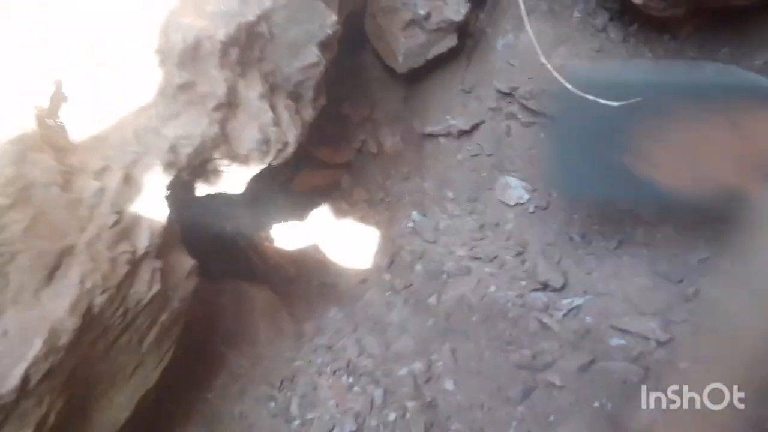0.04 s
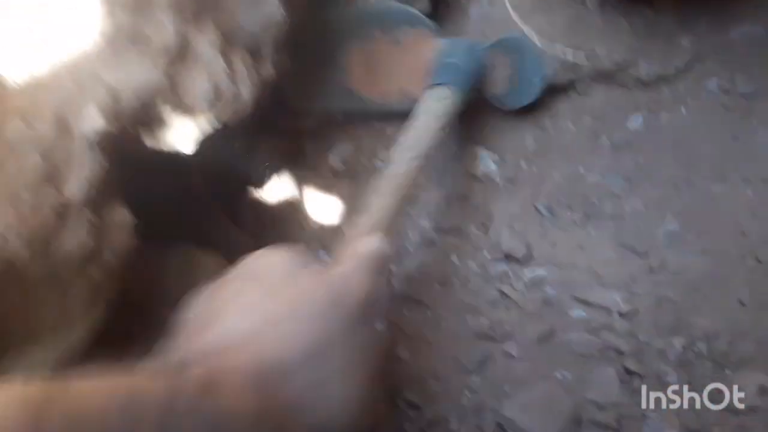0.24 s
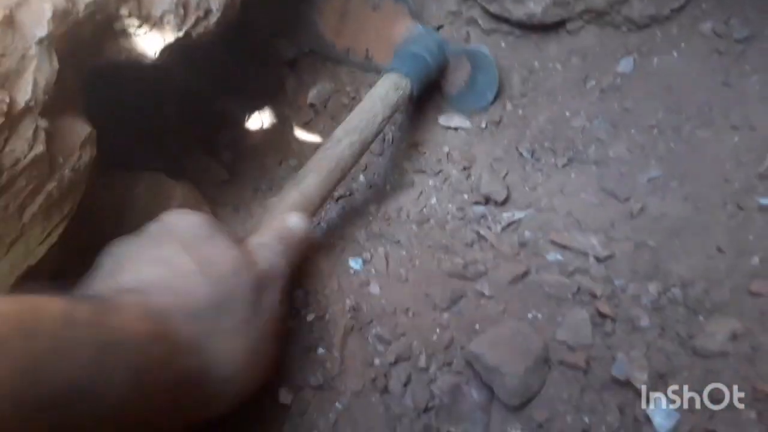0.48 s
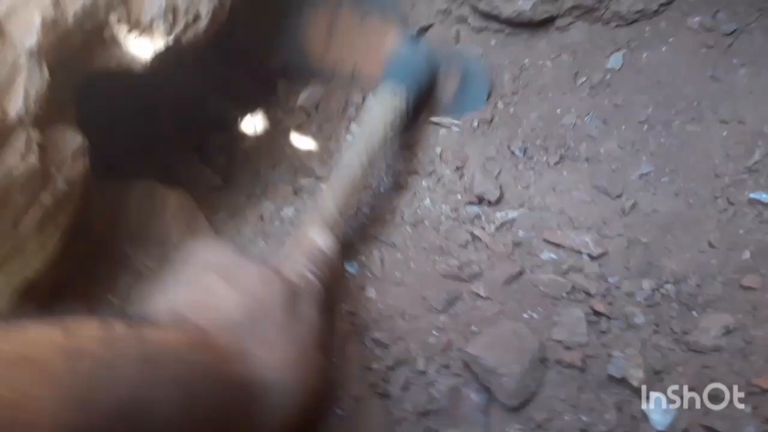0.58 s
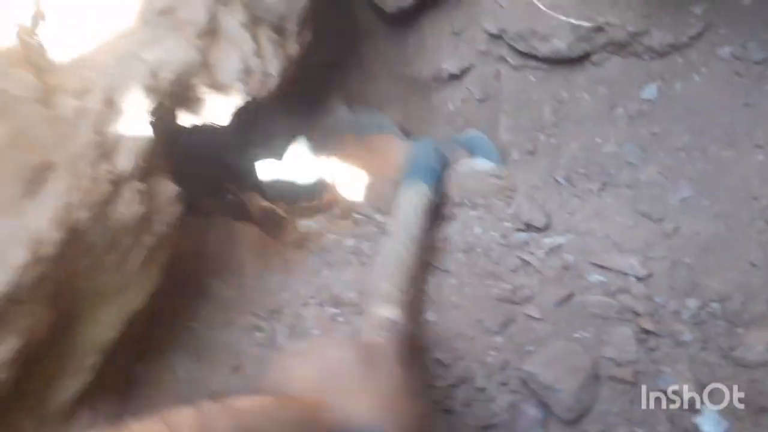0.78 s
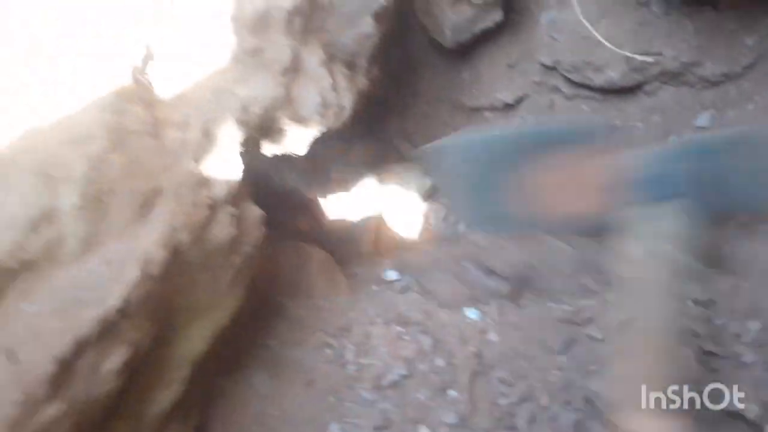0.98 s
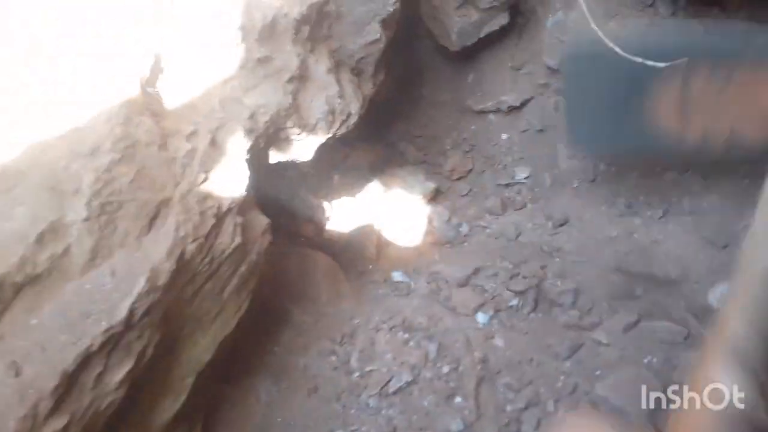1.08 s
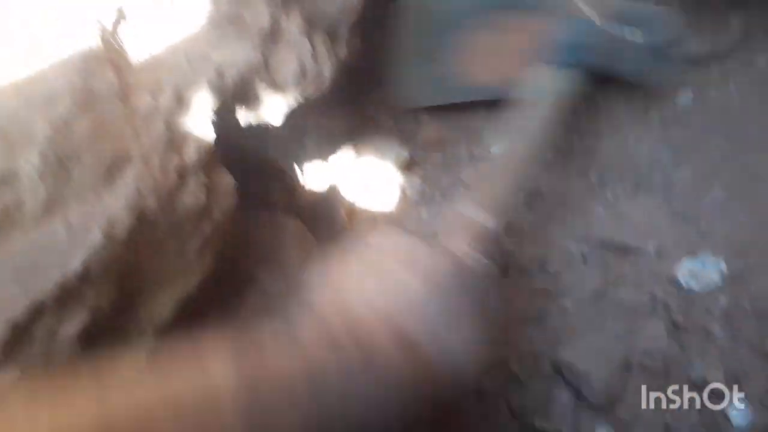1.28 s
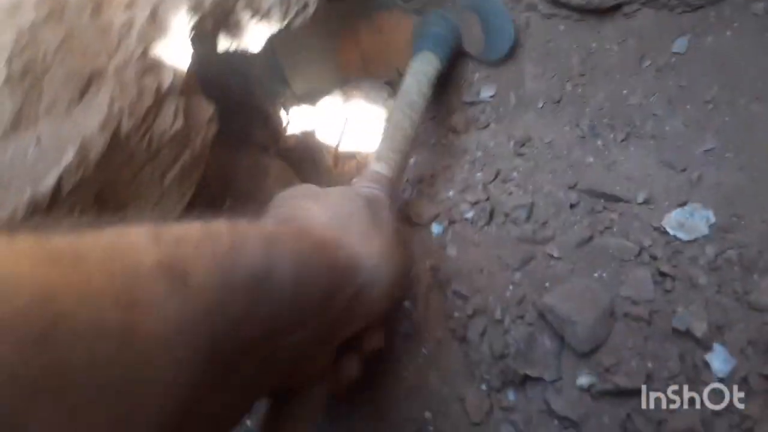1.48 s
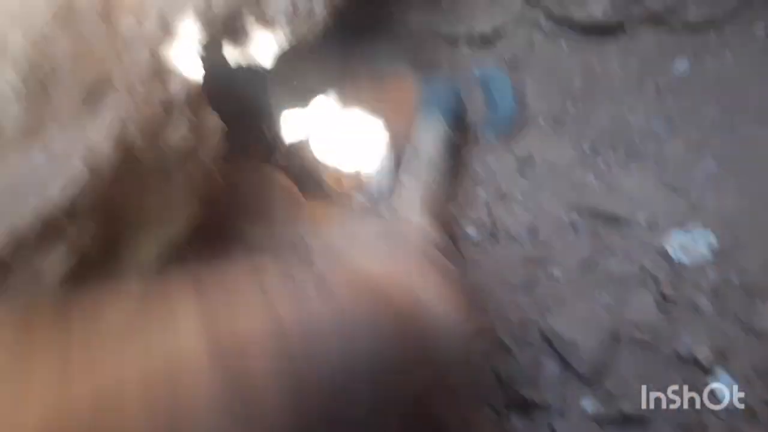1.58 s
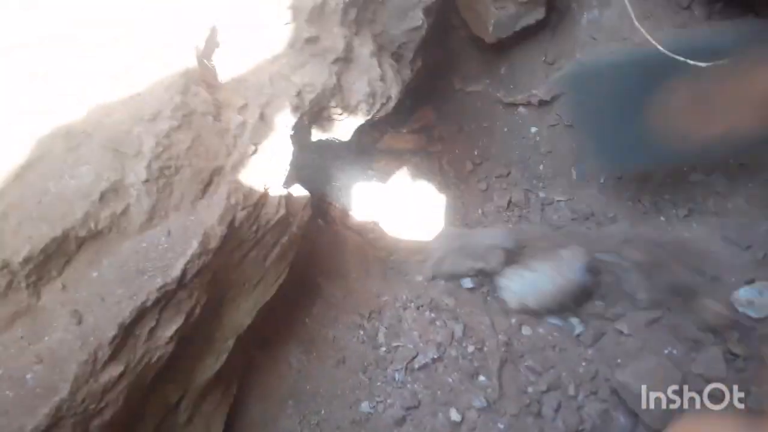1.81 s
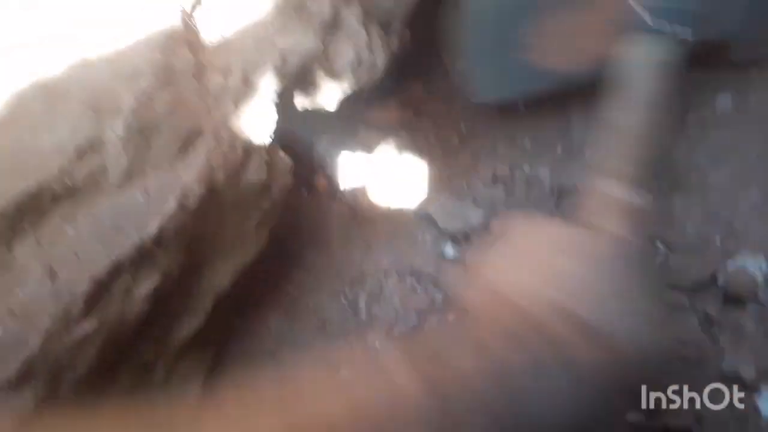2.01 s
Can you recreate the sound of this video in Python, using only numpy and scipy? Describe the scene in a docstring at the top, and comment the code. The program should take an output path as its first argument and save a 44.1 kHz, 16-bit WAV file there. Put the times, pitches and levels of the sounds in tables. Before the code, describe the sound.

Gritty scrapes and sharp clinks of a hoe digging into loose stones.

```python
"""Gritty scraping and sharp clangs: a steel hoe on a wooden handle strikes and drags through stony rubble.
Grit jolts the blade, which rings over the thrum of the handle; once it squeals on rock, sticking and
slipping. Loose chips tick as they fall and the pit walls answer briefly, over a faint hush.
All of it is close to one mono microphone."""
import sys
import numpy as np
from scipy import signal
from scipy.fft import rfft, irfft, next_fast_len
from scipy.io import wavfile
from scipy.ndimage import uniform_filter1d, map_coordinates

SR = 44100
rng = np.random.default_rng(int(sys.argv[2]) if len(sys.argv) > 2 else 0)


def store_pcm(level_fs):
    """Save levels as 16-bit WAV."""
    pcm = np.round(np.clip(level_fs, -1, 1) * 32767).astype(np.int16)
    wavfile.write(sys.argv[1], SR, np.atleast_2d(pcm).T)


N = 90404
TIME = np.arange(N) / SR

# ringing modes of the steel blade: f/Hz, level/dB, t60/s
STEEL_MODES = [(4100, -2, .06), (6340, -12, .04), (7052, -14, .05), (8910, -12, .04), (9580, -5, .06),
               (9890, -8, .05), (11430, -8, .05), (11920, -10, .05), (12570, -6, .07), (14230, -8, .05),
               (14600, -10, .04), (15210, -7, .07)]
# thrum of handle and ground: f/Hz, width/Hz, level/dB
HANDLE_MODES = [(134.7, 48, -4), (335.6, 73, -1), (452.7, 260, -14.5)]
# clink of the rubble: f/Hz, width/Hz, level/dB
STONE_MODES = [(3206, 750, -0.5), (4198, 140, 6.5), (4630, 230, 4), (5166, 160, 1.5), (6820, 91, -6.5),
               (7310, 140, -10)]


def amp(db):
    """dB to gain."""
    return 10 ** (np.asarray(db) / 20)


def unit(x):
    """Scale to rms 1."""
    return x / np.sqrt(np.mean(x ** 2) + 1e-20)


def eq_gain(points, hz):
    """Gain of an EQ curve drawn through (f/Hz, level/dB) points on a log axis."""
    f, db = np.transpose(points)
    return amp(np.interp(np.log(hz + 1), np.log(f + 1), db))


def curves(rows):
    """One value per sample for each column after the time."""
    times, *columns = np.transpose(rows)
    return [np.interp(TIME, times, column) for column in columns]


def filtered(x, response):
    """x through a complex frequency response."""
    size = next_fast_len(N + SR // 2)
    return irfft(rfft(x, size) * response(np.fft.rfftfreq(size, 1 / SR)), size)[:N]


def band_noise(low_hz, high_hz, samples):
    """Band-passed white noise."""
    b, a = signal.butter(2, [low_hz, high_hz], 'band', fs=SR)
    return signal.lfilter(b, a, rng.standard_normal(samples))


def wobble(samples):
    """Random flutter of rms 1, smoothed over so many samples."""
    return unit(uniform_filter1d(rng.standard_normal(N), size=samples))


def air():
    """The faint, steady hush of the pit."""
    # tone of the air: f/Hz, level/dB
    spectrum = [(24, -24), (40, 0.5), (104, 5.5), (204, -3.5), (600, -1), (965, -9.5), (1520, -6.5),
                (2980, -16), (16000, -22.5)]
    return amp(-60.5) * unit(filtered(rng.standard_normal(N), lambda f: eq_gain(spectrum, f)))


def pit_walls(x, t60=0.54):
    """The rock walls answer with a diffuse tail, cut short after an eighth of a second."""
    t = np.arange(SR // 8) / SR
    tail = rng.standard_normal(len(t)) * amp(-60 * t / t60) * (t > .003)
    return amp(-32.5) * signal.fftconvolve(x, tail / np.linalg.norm(tail))[:N]


def chips(t60=0.0086):
    """Each falling chip ticks: a few stubby modes and a spit of noise."""
    # stone chips landing: t/s, level/dB, f/Hz
    landings = [(0.0014, -22, 4270), (0.0151, -17, 11560), (0.0363, -24, 9700), (0.0412, -32.5, 4770),
                (0.055, -36, 7000), (0.0618, -31, 13000), (0.0984, -43.5, 7730), (0.1595, -34.5, 4000),
                (0.4231, -20.5, 8250), (0.4565, -24.5, 10800), (0.4697, -15, 5660), (0.5106, -27.5, 4600),
                (1.035, -32, 12300), (1.056, -27.5, 9700), (1.1694, -50, 4590), (1.7753, -27, 5460),
                (1.7998, -10.5, 7080), (1.8145, -30, 4450), (1.8211, -15.5, 1900), (1.8295, -14, 4470),
                (1.8306, -24, 4630), (1.8468, -30.5, 5740), (1.8653, -31, 9700), (1.8789, -16.5, 7460),
                (1.8872, -20, 4100), (1.9138, -28, 7170), (1.935, -35, 4670), (2.0147, -40.5, 4040)]
    out, t = np.zeros(N + SR), np.arange(SR // 20) / SR
    sine = lambda f: np.sin(2 * np.pi * f * t)
    for start, db, hz in landings:
        ratios = np.exp(rng.normal(0, 0.4, size=3))
        modes = sine(hz) + 0.064 * sum(sine(min(hz * k, 15000)) for k in ratios)
        spit = 2 * amp(-3) * band_noise(3000, 13000, len(t))
        low_mode = amp(-7) * sine(1800 * ratios[0] ** 0.54)
        out[round(start * SR):][:len(t)] += 0.23 * amp(db - 60 * t / t60) * (modes + spit + low_mode)
    return out[:N]


def ground_thump(start=.651, hz=122, rise_s=.01, t60=.13):
    """One dull thump as the blade bites into the ground."""
    t = (TIME - start).clip(0)
    return amp(-10.5 - 60 * t / t60) * (1 - np.exp(-t / rise_s)) * np.sin(2 * np.pi * hz * t)


def blade_song(tones_hz=(5685, 7615), waver_hz=9):
    """The blade's two longest-lived tones waver through both strokes, loud when the steel is free."""
    # swells, in phrases: t/s, lower tone/dB, upper tone/dB
    phrases = [
        [(0.244, -18, -43.5), (0.31, -77, -26), (0.352, -30, -44.5), (0.398, -46, -29), (0.436, -96, -100),
         (0.47, -51.5, -52.5), (0.5, -68, -65), (0.54, -51, -53), (0.55, -64, -61)],
        [(0.56, -62, -56.5), (0.578, -32.5, -27.5), (0.592, -27.5, -35.5), (0.622, -46.5, -45.5),
         (0.642, -20.5, -37), (0.668, -26.5, -27), (0.696, -22, -49), (0.704, -54, -52), (0.712, -19.5, -55),
         (0.724, -28.5, -68), (0.74, -72, -66), (0.78, -57, -70)],
        [(0.79, -48, -67), (0.806, -39, -47.5), (0.84, -45, -46), (0.862, -55, -39), (0.884, -45, -49.5),
         (0.918, -54, -50), (0.96, -42, -42), (0.984, -71, -45), (1.08, -83.5, -75.5)],
        [(1.329, -24.5, -50), (1.395, -44.5, -32), (1.419, -68, -64), (1.469, -62, -89), (1.493, -67, -38),
         (1.525, -32, -59), (1.551, -51, -60), (1.611, -34, -37), (1.65, -37, -47)],
        [(1.66, -52, -51.5), (1.704, -23.5, -47), (1.736, -27, -39.5), (1.776, -42, -52.5), (1.798, -48, -50.5),
         (1.852, -57, -60), (1.882, -66, -48), (1.9, -70, -67)],
    ]
    in_stroke = ((TIME >= .2415) & (TIME < 1.09)) | ((TIME >= 1.327) & (TIME < 1.92))
    out = np.zeros(N)
    for hz, db in zip(tones_hz, curves([row for phrase in phrases for row in phrase])):
        phase = 2 * np.pi * np.cumsum(hz + waver_hz * wobble(400)) / SR
        out += np.sqrt(2) * amp(db - 5) * np.sin(phase)
    return out * in_stroke


def grit(grains_per_s=330, grain_s=.0006):
    """Crushed grains of scattered size, each a tiny noise burst, over a bed of noise; rms 1."""
    onsets = rng.random(N) < grains_per_s / SR
    energy = onsets * amp(6 * rng.exponential(size=N).clip(0, 3))
    power = signal.lfilter([1], [1, -np.exp(-1 / (grain_s * SR))], energy)
    grains = unit(np.sqrt(power) * rng.standard_normal(N))
    return unit(grains + amp(-13) * rng.standard_normal(N))


def shaken(jolts, level_db, modes, own_share=.7):
    """Resonances (f/Hz, width/Hz, level/dB), each driven by the shared jolts and by its own grit."""
    out = np.zeros(N)
    for hz, width, db in modes:
        drive = amp(level_db) * (np.sqrt(1 - own_share) * jolts + np.sqrt(own_share) * grit())
        out += amp(db) * filtered(drive, lambda f: 1j * f * width / (hz * hz - f * f + 1j * f * width))
    power_gain = sum(amp(db) ** 2 * width for _, width, db in modes) * np.pi / SR
    return out / np.sqrt(power_gain)


def squeal(jitter_hz=25, full_db=-6, rasp_width_hz=300):
    """Stick-slip on rock: a near-pure tone that roughens as it swells and rasps in the upper steel."""
    # path of the squeal: t/s, f/Hz, level/dB
    path = [(.557, 3830, -45), (.562, 3810, -23), (.5655, 3795, -9), (.5675, 3800, -12), (.569, 3860, -27),
            (.574, 3820, -25), (.577, 3740, -11), (.580, 3700, -5), (.585, 3660, -7), (.589, 3600, -6),
            (.595, 3690, -9), (.599, 3800, -24), (.604, 3665, -24), (.608, 3670, -13), (.612, 3670, -14),
            (.6145, 3660, -30), (.618, 3650, -50)]
    # overtones: multiple of the pitch, level/dB against the tone at full_db, roughness (0-1)
    harmonics = [(2, -13, .3), (3, -19, .5), (4, -12, .3)]
    first, last = path[0], path[-1]
    hz, db = curves([(first[0] - .003, first[1], -120), *path, (last[0] + .0046, last[1], -120)])
    phase = 2 * np.pi * np.cumsum(hz + jitter_hz * wobble(120)) / SR
    overtone_db = full_db + 1.5 * (db - full_db)  # overtones swell faster than the tone
    overtones = sum(amp(g + overtone_db) * (1 - rough + rough * wobble(120)) * np.cos(k * phase)
                    for k, g, rough in harmonics)
    upper_steel = [(f, rasp_width_hz, g) for f, g, _ in STEEL_MODES[2:]]
    rasp = shaken(grit(), np.where(db > -40, .5 * db, db) - 31, upper_steel)
    return np.sqrt(2) * amp(-0.5) * (amp(db) * np.sin(phase) - overtones + rasp)


def catches(per_s=220, depth_db=2.2):
    """The blade catches and slips unevenly: a lumpy level curve in dB."""
    knots = rng.standard_normal(int(N * per_s / SR) + 4)
    gain = amp(depth_db * map_coordinates(knots, [TIME * per_s]))
    return 20 * np.log10(unit(gain))


def crunch(grains, low_hz, high_hz):
    """One band of the grit's own sound as it is crushed; rms 1."""
    # tone of crushed grit: f/Hz, level/dB
    spectrum = [(200, -15), (600, -12), (1500, 20), (2700, -13), (4500, -18.5), (8000, -29), (15000, 14.5)]
    band = lambda f: 1 / (1 + (low_hz / (f + 1)) ** 6) / (1 + (f / high_hz) ** 6)
    return unit(filtered(grains, lambda f: eq_gain(spectrum, f) * band(f)))


def drag(buried_t60_ratio=.55):
    """Crunching grit shakes the half-buried blade, the stones and the handle."""
    # the scrape, in phrases: t/s, blade body/dB, blade bending/dB, treble/dB, handle thrum/dB
    phrases = [
        [(0.0, -56, -42.5, -53.5, -50), (0.014, -52, -45, -42, -84), (0.026, -53.5, -58.5, -48.5, -56),
         (0.034, -55, -59, -49, -59), (0.092, -71, -73, -78.5, -67.5), (0.128, -66, -63, -59, -71),
         (0.148, -60, -58.5, -59.5, -56), (0.162, -57.5, -53, -57, -52), (0.222, -65, -67, -70.5, -81)],
        [(0.243, -28, -27.5, -24.5, -24.5), (0.258, -36, -38, -38, -47), (0.272, -29.5, -30.5, -22, -26),
         (0.282, -39, -29, -37, -49), (0.312, -45.5, -49.5, -36, -46), (0.334, -33, -44.5, -51.5, -48),
         (0.35, -31, -35, -23, -37), (0.371, -29, -34.5, -17, -31), (0.381, -34.5, -46, -38, -36),
         (0.391, -34, -42, -20.5, -38), (0.401, -38.5, -61, -26.5, -39), (0.408, -41, -53.5, -42.5, -42),
         (0.424, -50, -62, -47, -48.5), (0.446, -75.5, -92, -77.5, -67.5), (0.466, -69, -59, -44, -48.5),
         (0.506, -69.5, -75.5, -71, -69), (0.536, -49, -32.5, -38, -37), (0.56, -48, -63, -51, -48.5)],
        [(0.6, -48, -37, -17.5, -31), (0.614, -37, -42, -41, -37.5), (0.626, -40.5, -42, -37.5, -48.5),
         (0.642, -21, -19, -28.5, -25), (0.666, -33, -37, -19.5, -35.5), (0.684, -35, -30, -25.5, -33),
         (0.722, -32, -32, -26.5, -31), (0.732, -44, -33.5, -39, -38.5), (0.748, -42.5, -55, -38.5, -52.5),
         (0.766, -43, -39, -27, -37), (0.782, -45, -27.5, -31, -45.5), (0.8, -34, -35.5, -33, -38)],
        [(0.81, -30, -29, -22.5, -40.5), (0.83, -39.5, -34.5, -38, -36), (0.8345, -29.5, -24, -15, -38.5),
         (0.843, -34.5, -32, -36.5, -34), (0.858, -39.5, -29.5, -37.5, -43.5), (0.878, -31, -43, -25, -39.5),
         (0.892, -55, -39.5, -50, -40), (0.906, -49.5, -41, -30.5, -52), (0.92, -41.5, -43, -24.5, -55),
         (0.932, -39.5, -28.5, -17.5, -42.5), (0.95, -49.5, -46, -37.5, -47), (0.988, -53.5, -52.5, -54, -49),
         (1.032, -55, -56, -56.5, -56), (1.05, -71.5, -79, -62, -72)],
        [(1.07, -65, -75, -58, -76), (1.234, -66, -62, -75, -62), (1.25, -67, -56.5, -61, -50),
         (1.306, -59, -58, -77, -64.5)],
        [(1.333, -41.5, -22.5, -28, -47.5), (1.345, -25, -31, -17.5, -39), (1.369, -34, -19.5, -20, -33),
         (1.385, -21.5, -21.5, -13, -27.5), (1.401, -22, -30, -28, -37.5), (1.433, -71.5, -57, -57, -58),
         (1.445, -34.5, -46, -35.5, -48), (1.467, -60, -40.5, -46, -37.5), (1.479, -40.5, -42.5, -51, -44),
         (1.487, -56.5, -35, -54.5, -50.5), (1.495, -35, -26.5, -27, -54), (1.5, -39.5, -35, -39, -55)],
        [(1.51, -39.5, -40, -38.5, -33), (1.526, -30.5, -23, -30.5, -45.5), (1.544, -38, -24.5, -29.5, -31.5),
         (1.561, -26, -26.5, -23.5, -35), (1.566, -21.5, -15.5, -28, -38.5), (1.582, -33, -17.5, -16, -29),
         (1.612, -26.5, -20, -18.5, -35.5), (1.636, -24.5, -24.5, -28.5, -36),
         (1.662, -33.5, -28.5, -32.5, -39.5), (1.69, -30.5, -19, -17.5, -52), (1.716, -40.5, -27, -27.5, -49.5),
         (1.746, -55, -53, -54, -46), (1.76, -50.5, -43.5, -51.5, -59.5)],
        [(1.77, -62, -57, -46.5, -59), (1.786, -64, -61, -54.5, -63.5), (1.796, -61, -47, -45, -52),
         (1.834, -50, -44.5, -36, -46), (1.86, -73, -68, -57, -56), (1.88, -54, -46, -39.5, -56),
         (1.898, -53, -55, -55, -50), (1.936, -60, -68, -62.5, -64), (2.05, -69, -60.5, -69, -54.5)],
    ]
    # blade and handle, damped by the ground: f/Hz, width/Hz, level/dB
    body_modes = [(795, 57, 2.5), (1277, 404, 0), (1460, 50, -0.5), (2240, 270, -6)]
    # main bending of the blade: f/Hz, width/Hz, level/dB
    bending_modes = [(1807, 71, 6.5), (1925, 82, 6), (1990, 57, -6.5)]
    # each phrase holds its last levels until 2 ms before the next
    holds = [(after[0][0] - .002, *phrase[-1][1:]) for phrase, after in zip(phrases, phrases[1:])]
    rows = sorted(holds + [tuple(row) for phrase in phrases for row in phrase])
    body_db, bending_db, treble_db, thrum_db = curves(rows)
    catch_db = catches()
    body_db += catch_db
    bending_db += catch_db
    treble_db += 0.77 * (catch_db + catches())
    ring_db = treble_db - 9.5 + 0.81 * np.minimum(treble_db + 61, 0)  # a light scrape barely rings
    buried_steel = [(hz, np.log(1000) / (np.pi * t60 * buried_t60_ratio), db + 10 * np.log10(t60))
                    for hz, db, t60 in STEEL_MODES]
    low_grit, high_grit = grit(), grit()
    body = shaken(low_grit, body_db, body_modes)
    bending = shaken(low_grit, bending_db - 2, bending_modes)
    ring = shaken(high_grit, ring_db, buried_steel)
    stones = shaken(low_grit, treble_db - 6, STONE_MODES)
    grind = amp(body_db - 20.5) * crunch(low_grit, 300, 2300)
    fizz = amp(treble_db - 8.5) * crunch(high_grit, 2700, 34000)
    thrum = shaken(rng.standard_normal(N), thrum_db, HANDLE_MODES)
    # the blade responds weakly between its bending and its clinks
    scoop = lambda f: 1 - 0.55 * np.exp(-((f - 2950) / 650) ** 2)
    return filtered(body + bending + ring + stones + grind + fizz, scoop) + thrum


def blows(knock_hz=747.5):
    """Each blade hit: a short clang, a crack with clinking stone, a knock, a ring and a handle thud."""
    # hits: t/s, level/dB, clang f/Hz, then relative to the hit: knock/dB, crack/dB, ring/dB, thud/dB
    hits = [(0.241, 3, 1707, -13.5, -11, -49, -34), (0.2479, -12.5, 1650, -33, -1.5, -35, -32),
            (0.2635, -0.5, 1657, -18, -12, -39.5, -62), (0.2714, -13.5, 1580, -35, -11, -15, -23),
            (0.2913, -12.5, 1670, -17.5, -10, -23.5, -27), (0.3031, -16.5, 1590, -12, -24, -18, -34),
            (0.3438, -17.5, 1420, -31, -13, -8, -9), (0.371, -18, 1630, -28, -8.5, -18, -23),
            (0.5312, -18, 1760, -36, -1.5, -34, -27.5), (0.6114, -12, 1650, -11, -20, -23, -27),
            (0.6403, -1, 1820, -16, -15, -18, -34.5), (0.7098, -6.5, 1246, -31, -14.5, -23, -19),
            (0.7219, -7.5, 1290, -42, -21, -34, -21.5), (0.7613, -16.5, 1860, -14, -11, -29, -33.5),
            (0.7745, -12.5, 1780, -29, -16, -24, -16), (0.8056, -9, 1930, -20, -5, -21, -51),
            (0.8331, -9, 2030, -13.5, -3.5, -16, -26), (0.9053, -25, 2060, -38, 3, -11.5, -17),
            (0.9177, -16.5, 1930, -20, -2, -5, -28), (0.9238, -16, 2075, -27, -7, -13, -15),
            (1.326, -2, 1987, -52, -13, -30, -34), (1.341, -9.5, 1750, -22.5, 5.5, -9, -21.5),
            (1.38, -12, 1680, -22, -8, -14.5, -43), (1.3975, -17, 1900, -0.5, -0.5, -17, -39),
            (1.4421, -33, 1810, -7, -3, -32, -1), (1.475, -21.5, 1780, -12.5, -20, -31, -5),
            (1.4943, -12.5, 1526, -39, -15.5, -26.5, -41), (1.52, -17, 1860, -38.5, -3.5, -30, -28),
            (1.5246, -12.5, 1873, -44, -4.5, -47, -17.5), (1.5297, -10.5, 1870, -26.5, -5.5, -35, -48),
            (1.5624, -3.5, 1852, -9, -12, -34, -40), (1.5788, 0, 1950, -31, -20, -30.5, -31),
            (1.596, -3, 1880, -30.5, -10.5, -32.5, -35), (1.6079, -5.5, 1930, -29, -10.5, -34.5, -37),
            (1.6311, -4, 1980, -15, -8, -36, -22), (1.647, -8.5, 1880, -21, -17.5, -35.5, -31),
            (1.711, -12.5, 1864, -39.5, -12, -15, -46)]
    # partials of the clang: multiple of its pitch, level/dB
    partials = [(1, -0.5), (.72, -13), (1.12, -31.5)]
    out, t = np.zeros(N + SR), np.arange(SR // 3) / SR
    fade = lambda t60: amp(-60 * t / t60) * (1 - np.exp(-t / 0.001))
    mode = lambda f, t60: np.sin(2 * np.pi * f * t) * fade(t60)
    for start, db, hz, knock_db, crack_db, ring_db, thud_db in hits:
        clang = sum(amp(g + rng.normal(0, 3)) * mode(k * hz, t60=0.022 / k) for k, g in partials)
        ring = sum(amp(g + rng.normal(0, 3.3)) * mode(f, t60) for f, g, t60 in STEEL_MODES)
        thud = sum(amp(g) * mode(f, t60=0.13 * 300 / f) for f, _, g in HANDLE_MODES)
        crack = band_noise(3600, 9000, len(t)) * fade(t60=0.013)
        clink = sum(amp(g + rng.normal(0, 5.2)) * mode(f, t60=0.0067) for f, _, g in STONE_MODES)
        knock = mode(knock_hz, t60=0.026)
        hit = (amp(-4.5) * clang + amp(crack_db + 1.5) * (crack + amp(-1) * clink)
               + amp(knock_db + 3) * knock + amp(ring_db + 2.5) * ring + amp(thud_db - 7) * thud)
        out[round(start * SR):][:len(t)] += amp(db) * hit
    return out[:N]


def scene():
    """A mono mix in which only the blows, chips and squeal feed the pit walls."""
    sharp = blows() + chips() + squeal()
    mono = sharp + pit_walls(sharp) + drag() + blade_song() + ground_thump() + air()
    return np.array([mono, mono])


def record(dry, ceiling=.95, bass_hz=60, top_hz=15900):
    """Soft overload, steep bass roll-off and a hard band limit."""
    clipped = dry / (1 + np.abs(dry / ceiling) ** 8) ** (1 / 8)
    response = lambda f: (f < top_hz) * (1j * f / (bass_hz + 1j * f)) ** 4
    return np.array([filtered(channel, response) for channel in clipped])


dry = scene()
out = record(dry)
store_pcm(out)
```